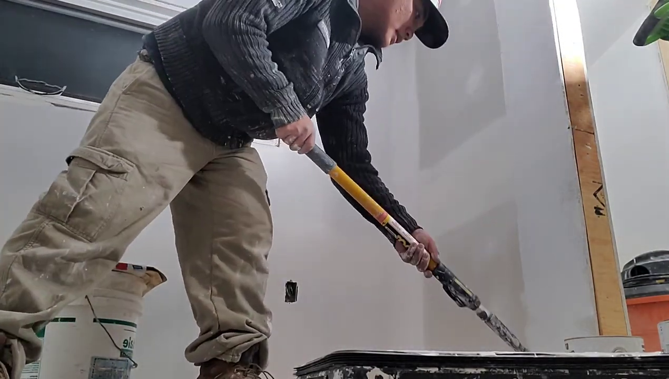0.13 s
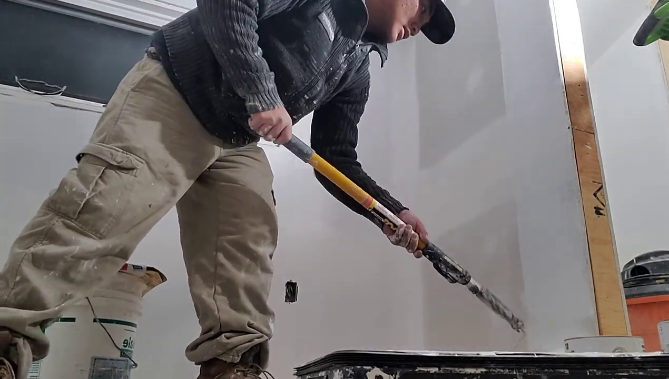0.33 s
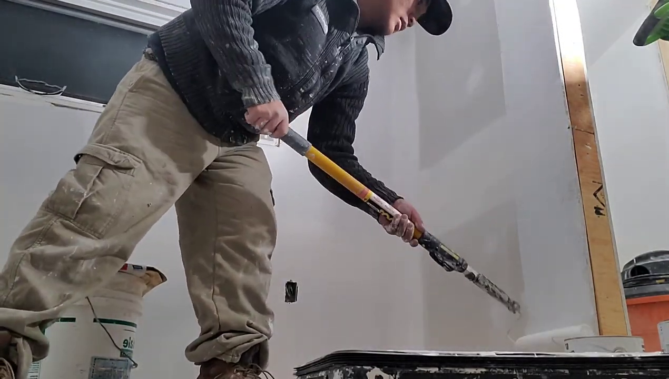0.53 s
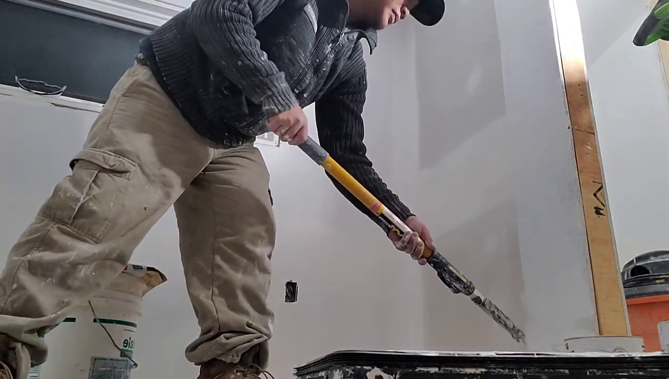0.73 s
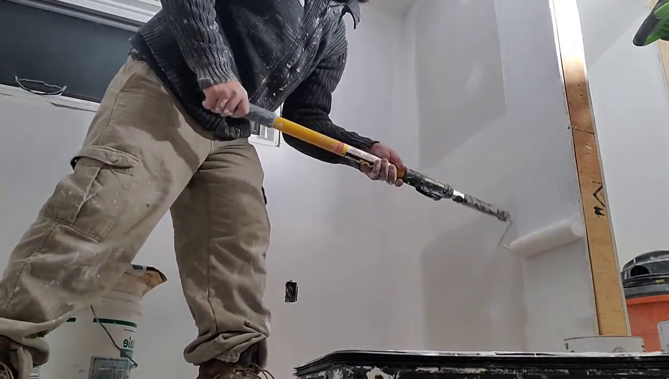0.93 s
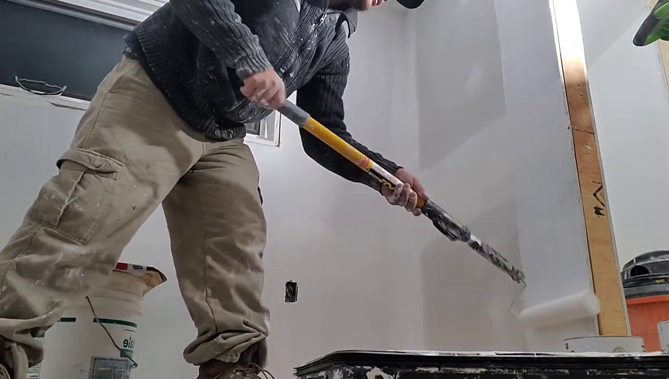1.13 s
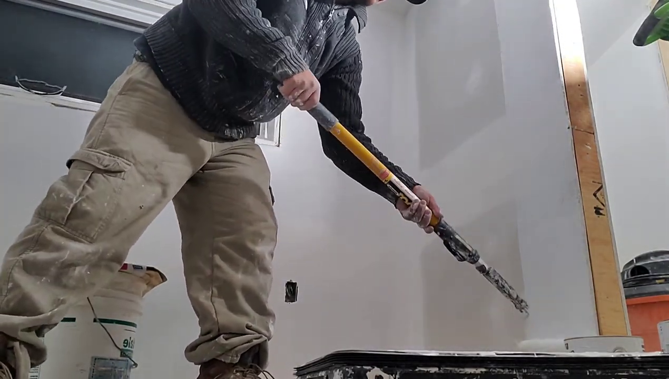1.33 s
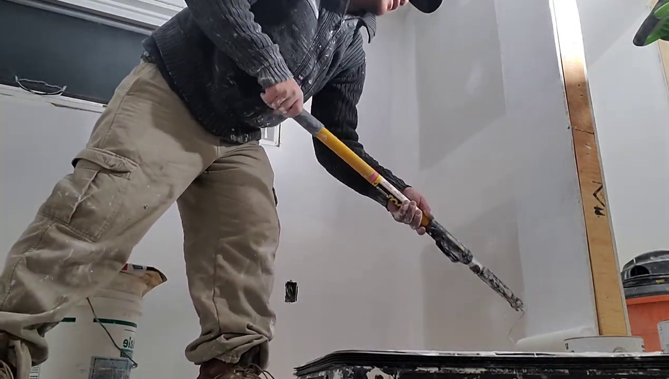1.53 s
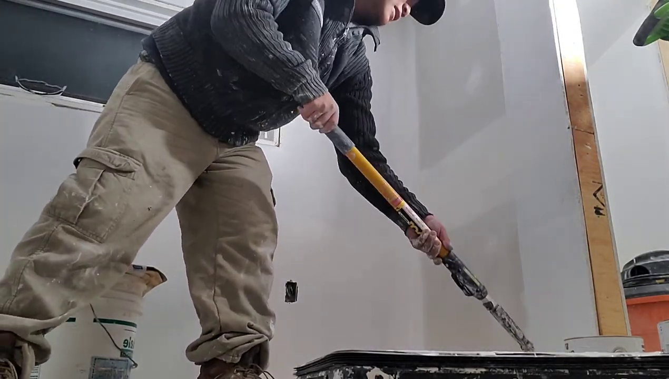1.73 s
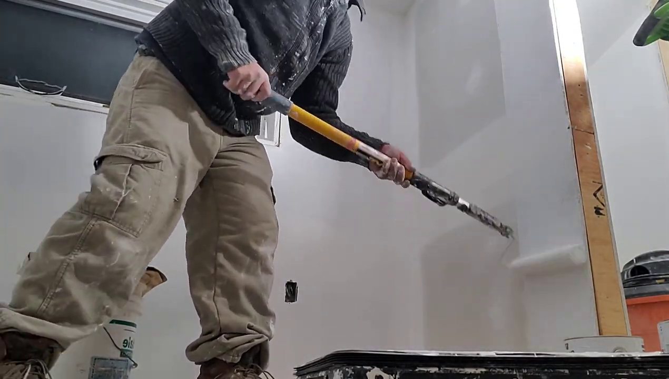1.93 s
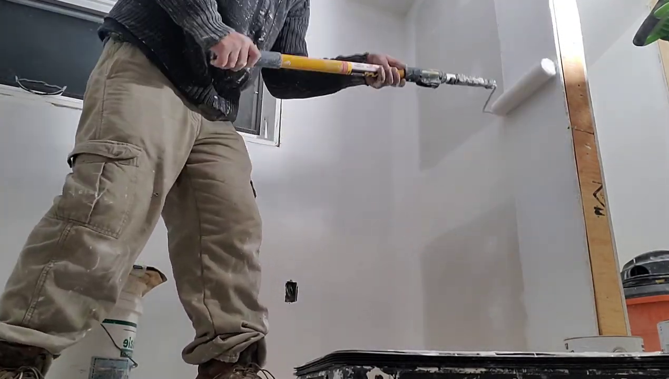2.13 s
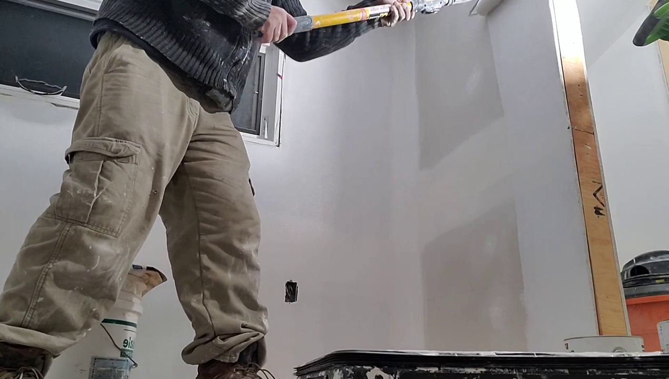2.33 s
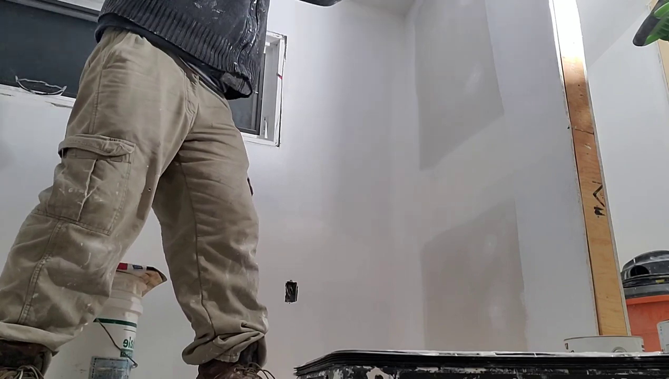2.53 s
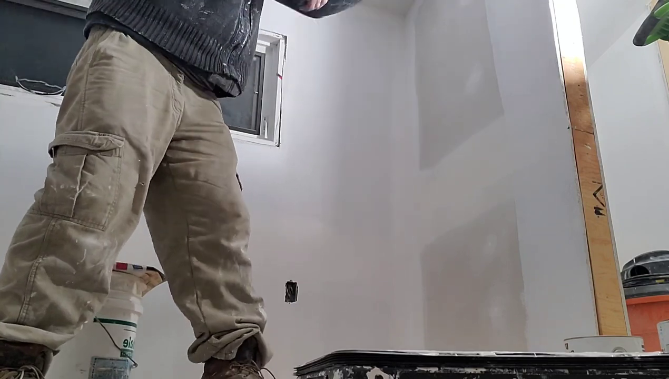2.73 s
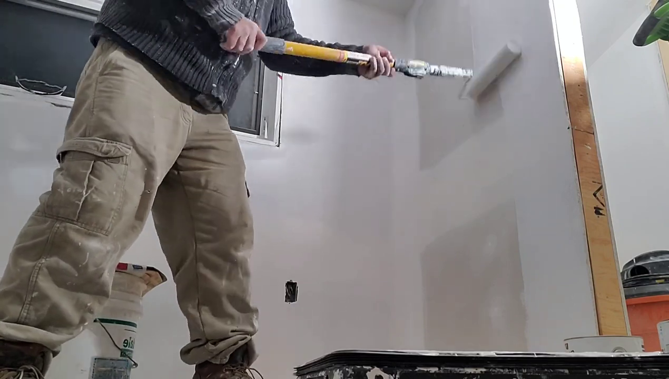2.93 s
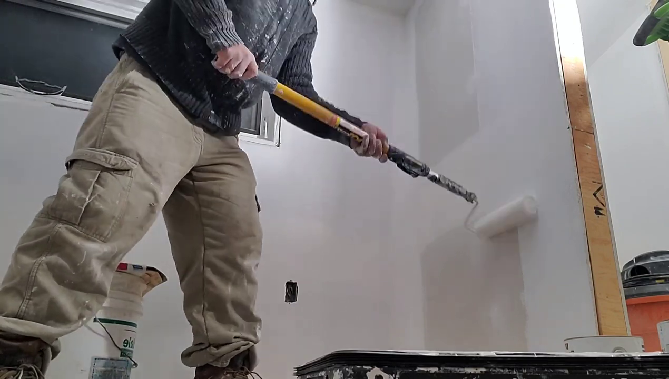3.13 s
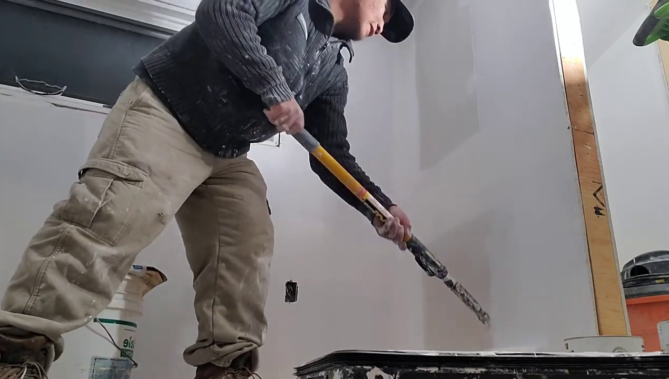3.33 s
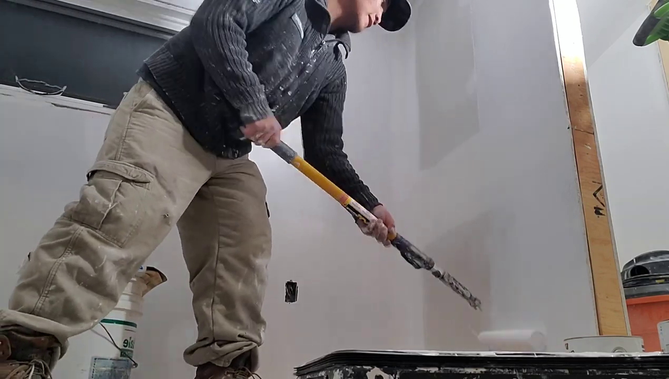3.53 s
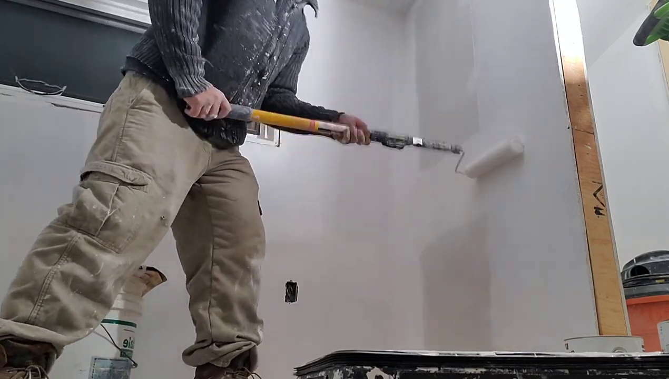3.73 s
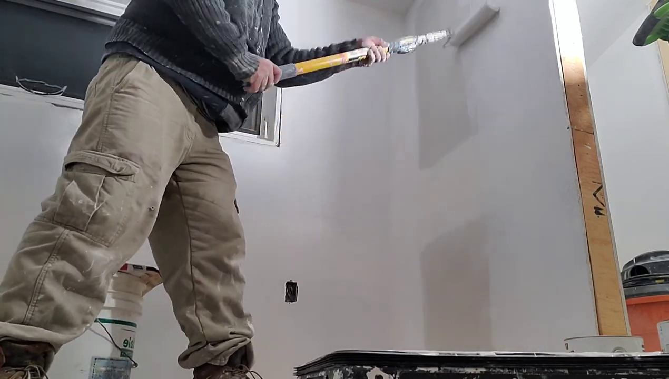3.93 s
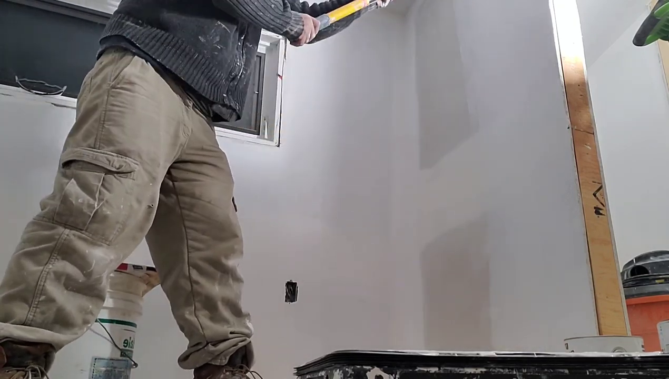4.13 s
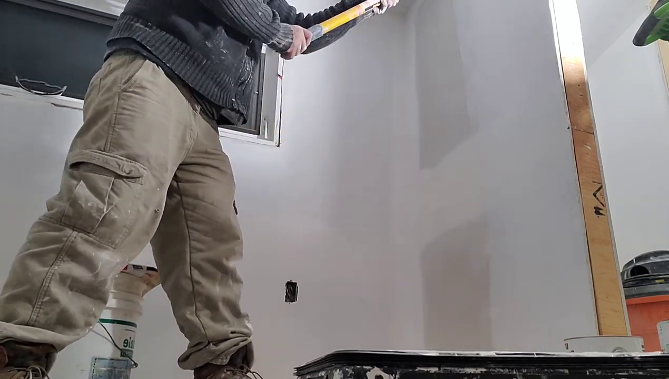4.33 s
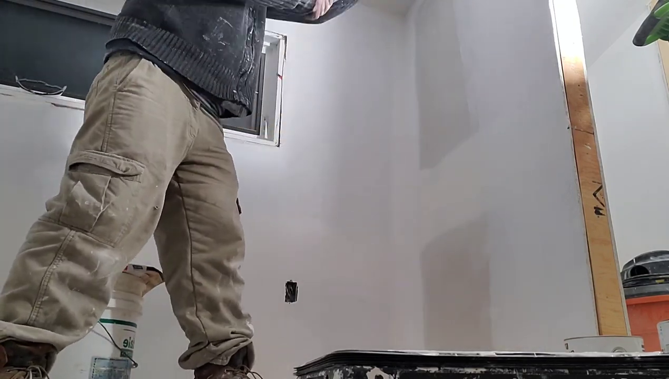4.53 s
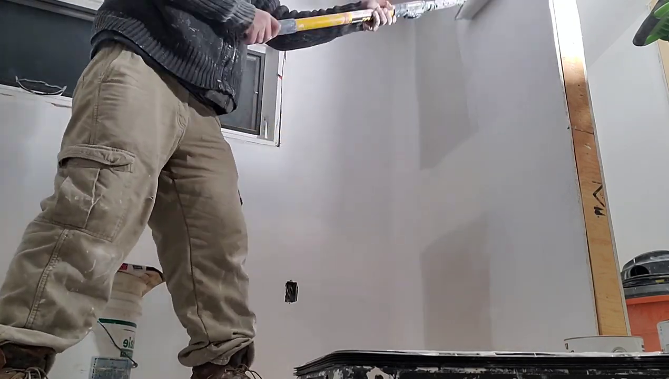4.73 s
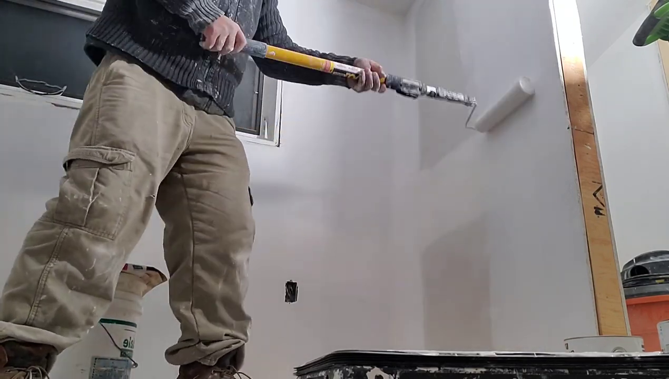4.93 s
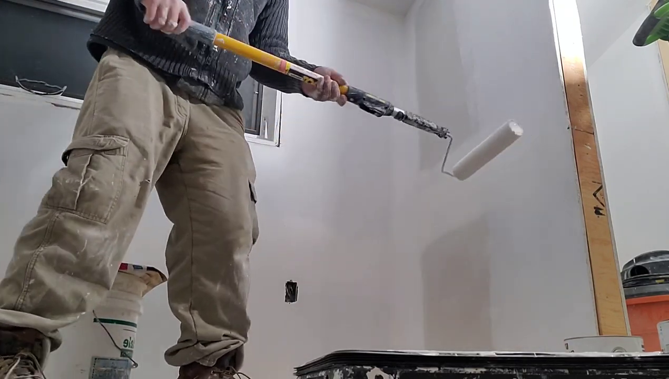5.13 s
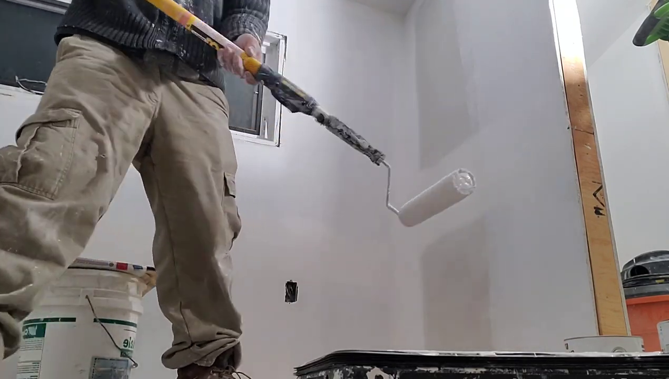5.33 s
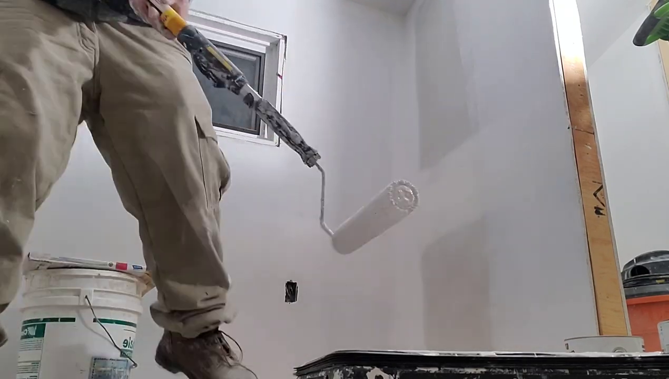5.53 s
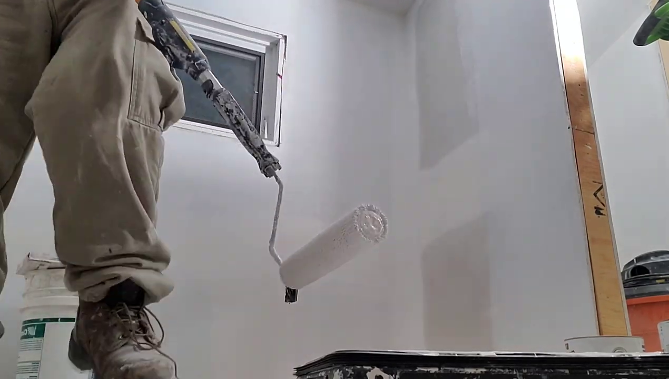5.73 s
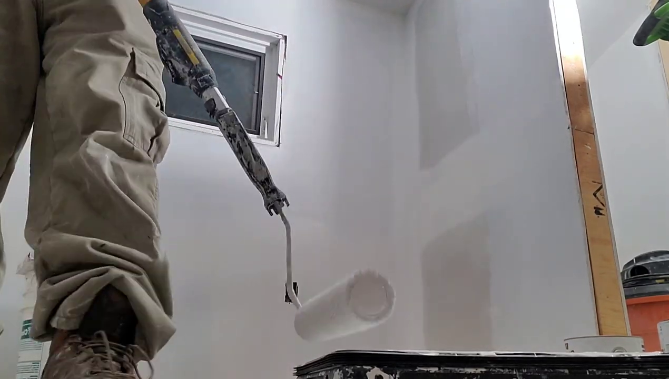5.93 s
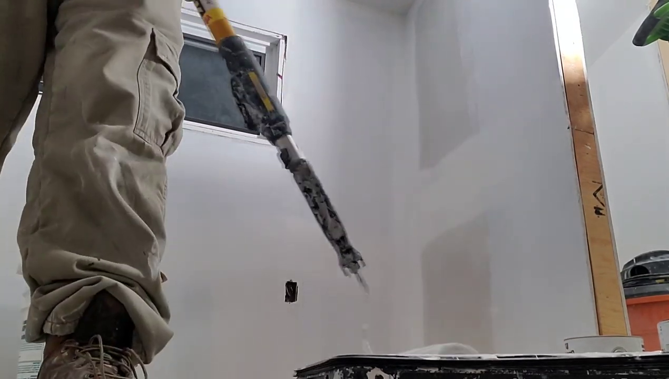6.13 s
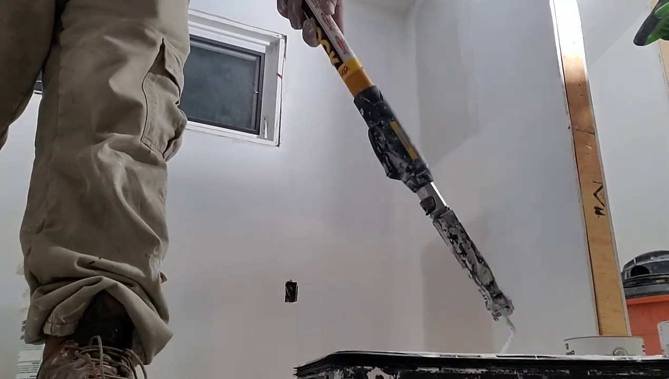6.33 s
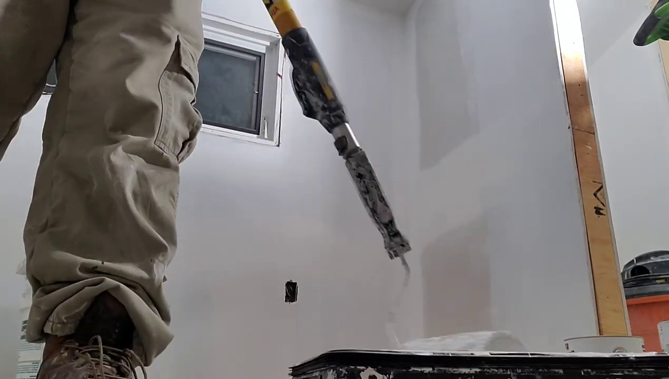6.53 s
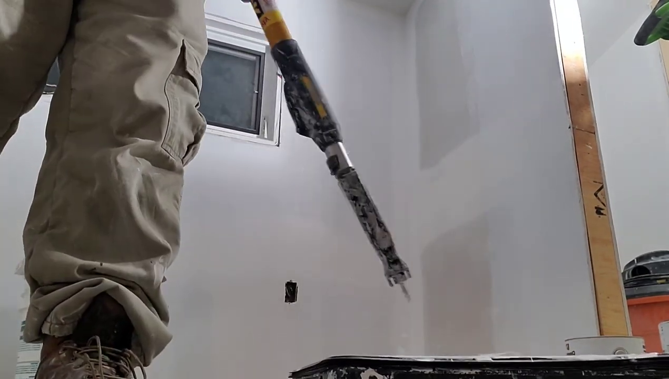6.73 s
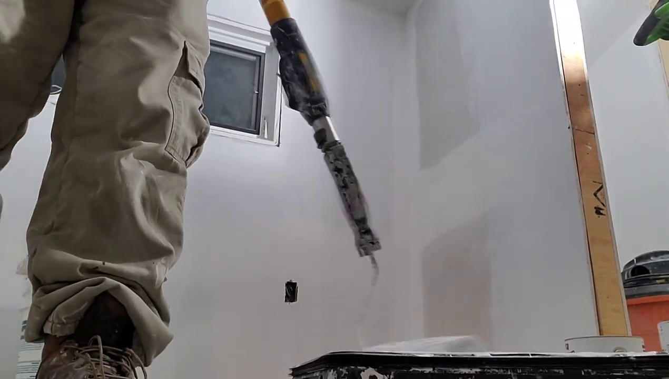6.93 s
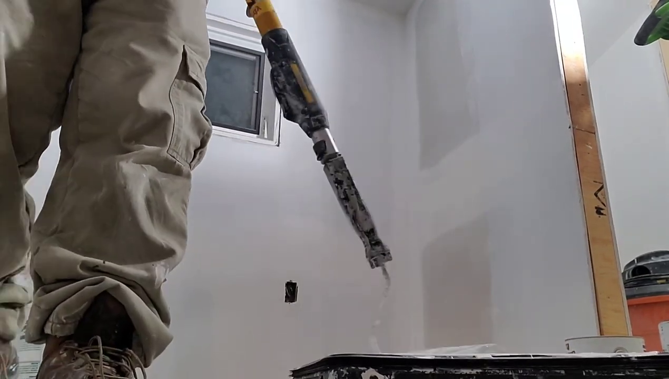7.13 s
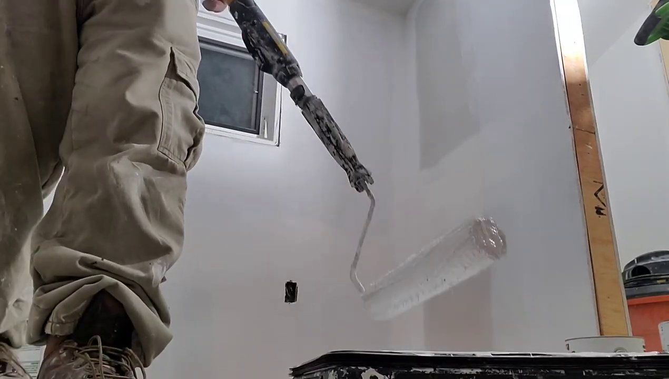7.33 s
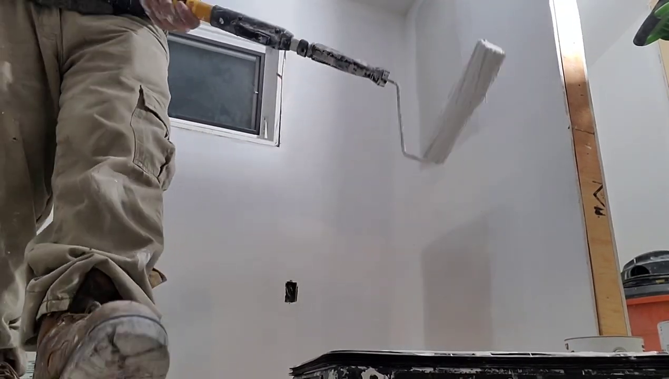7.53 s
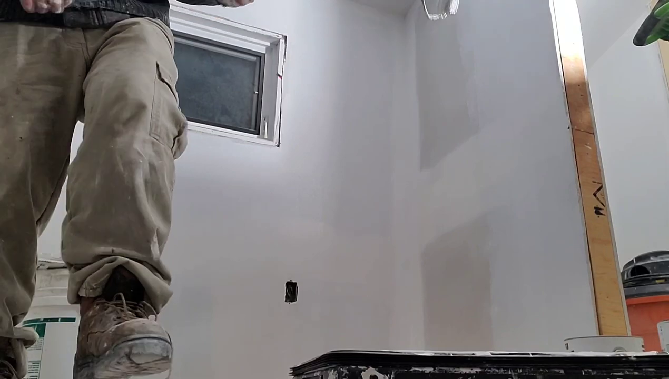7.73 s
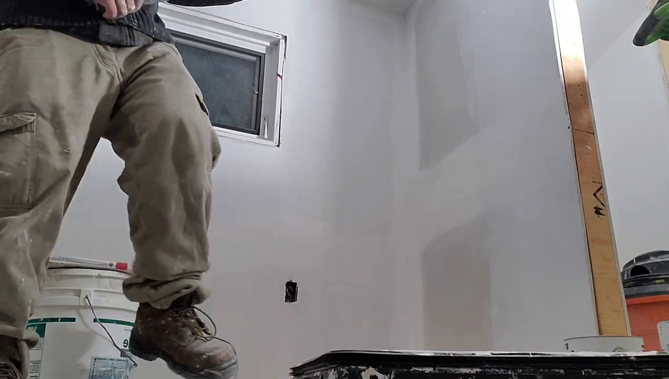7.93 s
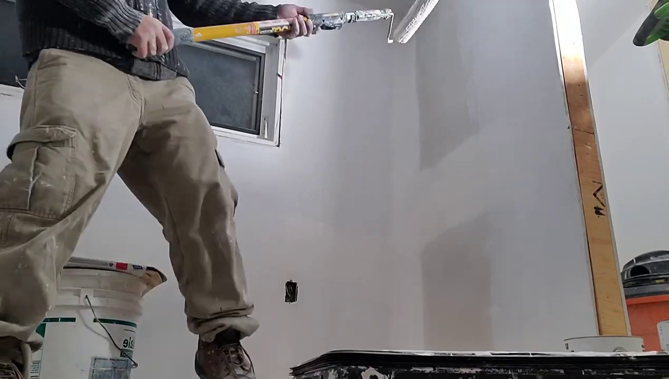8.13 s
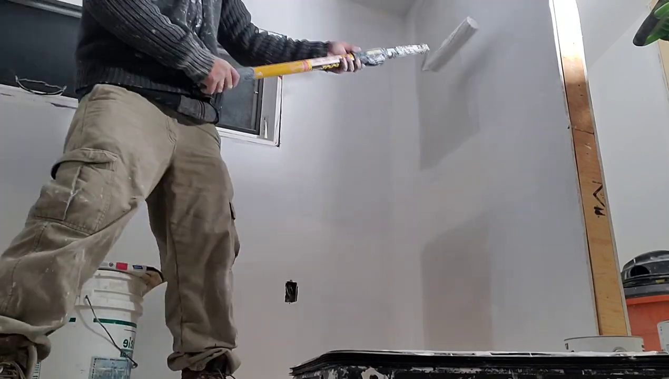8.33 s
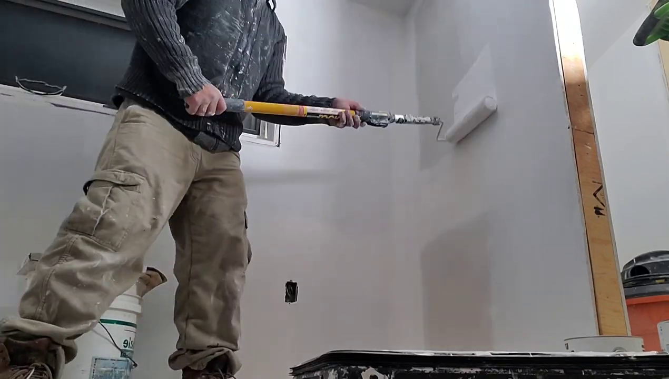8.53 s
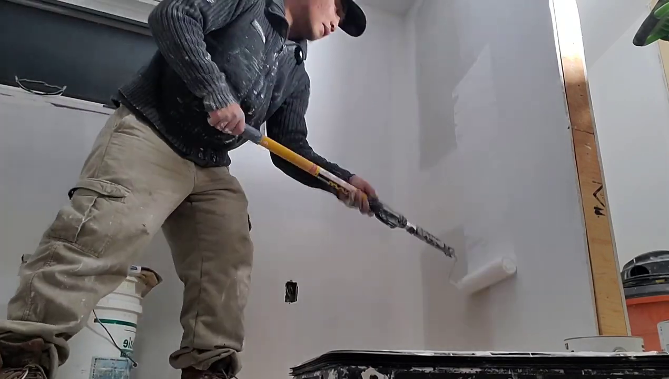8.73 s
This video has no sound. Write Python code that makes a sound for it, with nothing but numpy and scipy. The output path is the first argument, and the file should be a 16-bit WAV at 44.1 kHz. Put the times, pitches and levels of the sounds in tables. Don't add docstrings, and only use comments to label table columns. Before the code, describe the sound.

A wet paint roller hisses and rumbles over hollow drywall in uneven strokes, knocking and rattling, then dips into a plastic tray and returns.

```python
import sys
import numpy as np
from scipy import signal
from scipy.fft import rfft, irfft
from scipy.io import wavfile
from scipy.ndimage import uniform_filter1d

SR = 44100
rng = np.random.default_rng(int(sys.argv[2]) if len(sys.argv) > 2 else 0)


def transcribe(u):
    v = np.clip(np.atleast_2d(u).T, -1, 1)
    q = np.round(v * 32767).astype(np.int16)
    wavfile.write(sys.argv[1], SR, q)


def to_linear_factor(level_db):
    exponent = np.asarray(level_db, float) / 20
    return 10 ** exponent


N = 387198
CONTROL_STEP = 32

# start_s, peak_db, pitch_hz, ring_s, treble_rel_db
SLAPS = [
    (0.376, -16.5, 725, 0.31, -4),
    (0.511, -26.5, 700, 0.024, -3),
    (0.519, -16.5, 796, 0.24, 0),
    (0.813, -21.5, 990, 0.29, -6.5),
    (1.797, -19.5, 770, 0.32, 0),
]


def roller():
    # fastest_s, speed_up_s, slow_down_s, peel_hiss_db, pressure_db
    wall_strokes = [(0.0, .1, 0.26, -49.5, 3), (0.3, 0.086, 0.31, -51, 5.5), (0.55, 0.094, 0.23, -44.5, 9),
                    (0.9, 0.19, 0.22, -46.5, 2.5), (1.17, 0.17, 0.17, -48.5, 2),
                    (1.43, 0.12, 0.089, -56.5, 10), (1.63, 0.19, 0.14, -53.5, 4.5),
                    (1.9, 0.17, 0.48, -46.5, 5.5), (2.3, 0.42, 0.43, -42, 1), (2.919, .22, 0.33, -42, 7),
                    (3.25, 0.2, 0.22, -45.5, 7), (3.451, 0.055, 0.12, -56.5, 18),
                    (3.879, 0.42, 0.39, -38.5, 6), (4.34, 0.087, 0.11, -47, 3),
                    (4.51, 0.11, 0.09, -40.5, -1.5), (4.78, 0.22, 0.35, -38, 3),
                    (8.45, 0.057, 0.27, -47, 16.5), (8.7, 0.15, 0.39, -44, 10)]
    tray_strokes = [
        (6.09, 0.081, 0.097, -53.5, 3),
        (6.24, 0.15, 0.15, -45.5, -1.5),
        (6.62, 0.25, 0.26, -59.5, 14),
        (6.808, 0.14, 0.085, -43.5, -0.5),
        (7.03, 0.081, 0.19, -53, 10.5),
        (7.15, 0.14, 0.12, -49.5, 2),
    ]
    lifts = [(5.2, 0.21, 0.096, -71.5, 29), (5.37, 0.085, 0.25, -65.5, 17.5), (5.62, .15, 0.2, -75.5, 9.5),
             (5.96, 0.095, 0.36, -61.5, 14.5), (6.42, 0.22, 0.13, -64.5, 15), (6.89, .05, 0.068, -57.5, 4),
             (7.42, 0.6, 0.51, -68.5, 17.5), (7.65, 0.17, 0.23, -65, -4), (8.12, 0.99, 0.42, -72.5, 9.5),
             (8.368, 0.068, 0.04, -69, 36.5)]
    # spray_over_peel_db, scrub_over_rumble_db
    surfaces = [
        (1.5, -3.5),
        (-3, 4.5),
        (-7.5, -5),
    ]
    # freq_hz, level_db_per_hz
    peel_spectrum = [(530, -57), (900, -2), (1100, -27), (1190, -32), (1300, -26), (1860, -8.5),
                     (3510, -0.5), (5890, -1), (7040, 0), (8030, -10), (8500, -16), (11000, -14.5),
                     (18700, -120)]
    spray_spectrum = [(4590, -7), (7800, -38), (8090, -2.5), (10200, 5), (13400, 7.5), (15100, 8.5),
                      (15900, 7), (16200, -30.5)]
    scrub_spectrum = [(180, -39), (300, -5), (391, -1.5), (606, -9), (721, -6.5), (963, -20.5), (1400, -22),
                      (1820, -25), (3080, -120)]
    rumble_spectrum = [(13, -40), (30, -8.5), (97, -11.5), (161, 0.5), (215, 7.5), (278, 3.5), (346, -21.5),
                       (400, -17.5), (520, -26), (880, -120)]
    fling_db, fling_db_per_s = -23, 195.5
    speed_law = np.array([[1], [0.99], [1], [1]])

    power = 0
    for rows, (spray_db, scrub_db) in zip((wall_strokes, tray_strokes, lifts), surfaces):
        for *stroke, peel_db, press_db in rows:
            speed = arch(*stroke, 0) ** speed_law
            levels_db = peel_db + np.array([0, spray_db, press_db, press_db + scrub_db])
            power = power + (speed * to_linear_factor(levels_db)[:, None]) ** 2
    for start_s, peak_db, *_ in SLAPS:
        t = np.arange(power.shape[1]) * CONTROL_STEP / SR - start_s
        power[1] += (t > 0) * to_linear_factor(peak_db + fling_db - fling_db_per_s * np.abs(t)) ** 2
    peel, spray, load, nap = map(glide, power)

    tack = to_linear_factor(0.92 * walk(13) + walk(60))
    snaps = 0.5 * unit(grains(2500, 3.25))
    hiss = spread(tack, snaps, peel_spectrum) * peel * to_linear_factor(-0.5)
    hiss += spread(tack, snaps, spray_spectrum) * spray * to_linear_factor(0.2 * walk(1.1))

    rumbles = []
    for _ in range(2):
        lumps = rng.standard_normal(N) * to_linear_factor(1.8 * walk(25)) + 0.47 * unit(grains(90, 1.6))
        rumbles.append(unit(colour(lumps + 1.5 * wall(lumps), rumble_spectrum)))
    rumble = ports(*rumbles) * load
    scrub = spread(to_linear_factor(2.5 * walk(30)), 0.33 * unit(grains(120, 2)), scrub_spectrum) * nap
    return lean(hiss, -1) + rumble + scrub


def tray():
    # hardest_s, build_up_s, let_go_s, level_db
    squeezes = [(3.455, 0.051, 0.083, -42), (6.1, 0.12, 0.31, -43), (6.3, 0.12, 0.15, -47.5),
                (6.67, 0.05, 0.024, -42), (6.815, 0.17, 0.036, -36), (7.04, 0.09, 0.25, -41),
                (7.45, 0.82, 0.38, -64), (8.31, 0.14, 0.094, -59), (5.08, 0.13, 0.081, -53),
                (8.472, 0.034, 0.082, -28), (8.525, 0.049, 0.048, -32.5), (8.65, 0.38, 0.45, -42)]
    body = [(500, -11.5), (850, -3.5), (1250, -7.0), (1800, -7.0),
            (2600, -2.0), (3500, -5.5), (4800, -7.0), (8000, -22.5)]
    chatter = spread(to_linear_factor(3.4 * walk(28)), 0.76 * unit(grains(400, 2.3)), body)
    return chatter * arches(squeezes) * to_linear_factor(-1.5)


def thuds():
    # start_s, peak_db, pitch_hz, ring_s, crack_rel_db
    knocks = [(0.374, -27, 192, 0.17, 8), (0.507, -27, 162, 0.084, -9), (0.519, -17, 167.3, 0.23, -6),
              (0.921, -22.5, 211, 0.078, -41), (1.231, -9, 189, 0.066, -14),
              (1.247, -10, 165, 0.035, -11.5), (1.277, -18, 154, 0.043, -5), (1.318, -19, 179, 0.07, -13.5),
              (1.616, -35, 143, 0.079, -36.5), (1.79, -24, 170, 0.1, 1.5), (1.919, -15.5, 179, 0.029, -30),
              (2.429, -34, 139, 0.16, -4), (2.971, -21.5, 159, 0.061, -4.5), (2.991, -18, 154, 0.079, -13),
              (3.461, -19, 162, 0.11, -16), (3.727, -26, 141, 0.017, -25.5), (4.002, -25.5, 172, 0.17, -22),
              (4.08, -32, 134, 0.15, -19), (4.88, -15, 155.3, 0.047, -8), (5.137, -11, 147, 0.044, -13),
              (7.451, -28.5, 166, 0.049, -38), (8.179, -19.5, 159, 0.11, -50), (8.266, -28, 154, 0.14, -32),
              (8.463, -10, 142, 0.063, -6.5), (8.5, -13.5, 172.5, 0.12, -9)]
    # start_s, peak_db, pitch_hz, ring_s, crack_rel_db
    raps = [(0.813, -34, 408, 0.25, 4), (1.286, -23, 281, 0.14, 2), (5.107, -20, 287, 0.03, -18.5),
            (5.112, -6.5, 254, 0.045, -17.5), (5.921, -26, 224, 0.057, -19.5), (6.481, -19, 234, 0.061, -4),
            (6.495, -15.5, 240.5, 0.11, -8), (6.529, -16, 231, 0.038, -6), (6.513, -13, 250.4, 0.13, -12.5),
            (6.992, -21, 244, 0.047, -6.5), (7.122, -25.5, 417, 0.09, -28.5),
            (8.331, -30.5, 250, 0.077, -1.5)]
    # start_s, peak_db, pitch_hz, crack_rel_db
    thumps = [(1.233, -20, 100, -36), (5.111, -13.5, 116.5, -35), (1.548, -35.5, 120, -18),
              (5.308, -23, 98, -18), (5.329, -24, 82.5, -17), (5.379, -25, 92, -15), (5.915, -26, 88, -38),
              (5.963, -20, 82, -14.5), (6.035, -37, 78, 4), (6.149, -35.5, 80, -6), (6.246, -43, 74.5, 4),
              (6.379, -39, 81, -10), (6.657, -26.5, 74, -32), (6.76, -40.5, 82.5, 8), (6.841, -42.5, 83, 4),
              (7.207, -36, 86, -10), (7.291, -19.5, 105, -17), (7.592, -28, 88, -6.5),
              (8.389, -31, 61.4, -15), (8.451, -8.5, 128, -22), (7.334, -31, 86, -30),
              (7.475, -37, 87, -33)]
    board_ring_s, build_cycles, lag_s = 0.039, 0.86, 0.00323
    rattle_spectrum = [(150, -29.0), (350, 9.5), (550, 13.5), (900, 0.0),
                       (1300, -23.0), (3000, -21.5), (8000, -39.5)]
    pad_spectrum = [(30, -23.5), (65, 3.5), (100, 5.5), (140, 2.5),
                    (800, -5.0), (1400, -15.0), (3000, -45.5)]

    blow, crack = np.zeros(N + SR), np.zeros(N + SR)
    t = np.arange(SR // 3) / SR
    rattle = unit(colour(rng.standard_normal(N + SR), rattle_spectrum))
    boards = [(s, db, hz, board_ring_s, crack_db) for s, db, hz, crack_db in thumps]
    for start_s, peak_db, hz, ring_s, crack_db in knocks + raps + boards:
        i = int((start_s + lag_s) * SR)
        build_s = build_cycles / max(hz, 175)
        fade = to_linear_factor(peak_db - 3.0) * swell_decay(t, build_s, np.clip(ring_s, 0.02, 0.3))
        sagging_hz = hz * (1 + 0.25 * np.exp(-t / 0.0062))
        swing = -np.sin(2 * np.pi * np.cumsum(sagging_hz) / SR)
        noise = ring(rng.standard_normal(len(t)), 1.4 * hz, 1.5 * hz)
        shudder = unit(ring(noise, 0.89 * hz, 1.5 * hz))
        blow[i:i + len(t)] += fade * (swing + 0.44 * shudder)
        crack[i:i + len(t)] += fade * to_linear_factor(crack_db + 2.0) * rattle[i:i + len(t)]
    blow = colour(blow, pad_spectrum)
    hits = 1.76 * blow + 0.41 * wall(blow) + crack + rings()
    return room(hits[:N], wet_db=-5)


def rings():
    # start_s, peak_db, pitch_hz, swell_s, ring_s
    clean_rings = [(0.552, -9, 378, .013, 0.061), (0.582, -16, 368, 0.01, 0.069),
                   (.598, -24, 335, 0.0067, .04), (.615, -16, 365, 0.011, 0.046),
                   (0.639, -37, 343, 0.0053, .05), (0.655, -35, 360, 0.012, .05),
                   (.678, -34, 350, 0.0091, 0.092), (.694, -44, 387, 0.0066, .07),
                   (.722, -47, 356, 0.0075, .06), (1.290, -21.5, 663, 0.0055, 0.078),
                   (1.284, -31.5, 885, 0.005, 0.073), (1.305, -34, 1080, .006, 0.066),
                   (1.278, -14, 155, 0.0082, 0.035), (1.312, -28, 298, 0.0045, 0.073),
                   (1.352, -22, 283, .006, 0.08), (1.398, -31.5, 346, 0.0052, 0.09),
                   (3.481, -20, 170, 0.0083, 0.058), (3.514, -29, 156, 0.013, 0.073),
                   (5.121, -7.5, 472, 0.0059, 0.01), (5.150, -12.5, 282, .005, 0.077),
                   (5.165, -12, 316, 0.0043, 0.04), (5.185, -29, 253, .005, 0.073),
                   (5.223, -33, 282, .006, .15), (5.256, -36, 303, 0.0043, 0.12),
                   (6.499, -36, 2550, 0.0044, 0.027), (1.258, -15, 185.5, .007, 0.07),
                   (6.588, -17.5, 823, 0.0025, 0.037), (6.618, -25, 787, 0.0052, 0.042),
                   (7.298, -19, 302, 0.0028, 0.014), (8.462, -12.5, 790, 0.004, 0.024),
                   (8.545, -17, 130, 0.0056, .12), (8.587, -15, 146, 0.0073, 0.032),
                   (8.632, -23, 128, 0.0073, 0.083), (8.672, -37, 150, 0.0089, 0.068),
                   (0.80, -36, 71, 0.015, 0.25), (3.6, -40, 45, 0.057, 0.32),
                   (4.52, -30, 174, 0.0099, 0.17), (8.19, -33, 66, .015, 0.35), (8.39, -27, 45, .03, .3),
                   (8.737, -24, 112, .012, 0.13)]
    out, t = np.zeros(N + SR), np.arange(SR // 5) / SR
    for start_s, peak_db, hz, swell_s, ring_s in clean_rings:
        i = int(start_s * SR)
        fade = to_linear_factor(peak_db) * swell_decay(t, swell_s, ring_s)
        out[i:i + len(t)] += fade * np.sin(2 * np.pi * hz * t)
    return out


def clicks():
    # start_s, peak_db, ring_s, treble_rel_db
    frame_clicks = [(2.427, -21.5, 0.033, -36), (2.432, -19.5, 0.032, -29), (4.002, -13, 0.05, -15.5),
                    (4.886, -30.5, 0.067, -12.5), (5.112, -30, 0.043, -33.5), (5.118, -25, 0.23, -45),
                    (5.324, -40.5, 0.1, -11), (6.015, -25, 0.069, -34), (6.248, -29, 0.053, -23),
                    (6.256, -28, 0.06, -20), (6.485, -25, 0.11, -47.5), (6.503, -26.5, 0.15, -23),
                    (6.535, -21.5, 0.024, -39), (6.622, -50, 0.053, -30), (6.657, -26, 0.031, -17),
                    (6.699, -37, .04, -16), (6.793, -33, 0.033, -3), (6.817, -24.5, 0.05, -6.5),
                    (6.974, -24, 0.065, -28), (7.006, -21.5, 0.034, -24.5), (7.71, -43, 0.093, -26)]
    # start_s, peak_db, pitch_hz, ring_s, treble_rel_db
    splashes = [
        (5.36, -39.5, 2560, 0.13, -7),
        (5.921, -37, 735, 0.21, -8.5),
        (6.162, -35, 2460, 0.068, -25),
        (6.203, -37.5, 2490, 0.23, 8.5),
        (8.379, -36.5, 1080, 0.53, -2.5),
    ]
    ticks = [
        (0.195, -41, 1820, 0.034, -8),
        (1.240, -32.5, 754, 0.089, -13),
        (5.688, -48, 973, 0.06, -15.5),
        (5.857, -40, 2820, 0.14, -14),
        (7.599, -32, 710, 0.077, -3),
        (7.9, -43, 930, 0.09, -3),
        (8.051, -54, 3310, 0.13, 4.5),
    ]
    ribs = [
        (6.272, -29, 940, .05, -40.5),
        (6.305, -17, 1510, 0.025, -56),
        (6.336, -30, 950, 0.088, -44),
        (6.588, -12.5, 1670, 0.013, -36),
        (5.921, -40, 5600, 0.069, -9),
        (6.022, -38, 2700, .04, -18),
    ]
    # freq_hz, gain_db
    phone_colour = [(1000, 7.5), (4500, 13), (6600, 4), (7500, -5.5), (8100, -16.5), (11000, -0.5),
                    (15500, 14.5)]
    frame_hz = 760
    near_wet_db = -2

    frame = [(s, db, frame_hz, ring_s, treble_db) for s, db, ring_s, treble_db in frame_clicks]
    # rows, top octave over treble (dB), near the phone
    kinds = ((SLAPS, 14.5, 0), (splashes, 8.5, 0), (ticks, -34.5, 0), (frame + ribs, 8.5, 1))
    out, t = np.zeros((2, N + SR)), np.arange(SR // 6) / SR
    noise = rng.standard_normal(N + SR)
    for rows, top_over_db, near in kinds:
        for start_s, peak_db, hz, ring_s, treble_db in rows:
            i = int(start_s * SR)
            top_db = treble_db + top_over_db
            decay = to_linear_factor(-60 * t / np.clip(ring_s, 0.005, 0.4)) + 0.61 * np.exp(-t / 0.0013)
            burst = noise[i:i + len(t)] * decay
            slope = [(300, -15.5), (700, 0.5), (2000, -4.0), (3600, 0.26 * treble_db - 3.0),
                     (5500, treble_db), (7500, treble_db + 14.5), (9000, top_db), (16000, top_db - 21.5)]
            hit = colour(burst, slope, size=256)
            hit += 1.55 * ring(burst, hz, 0.11 * hz)
            hit += 0.54 * ring(burst, 0.64 * hz, 0.49 * hz)
            out[near, i:i + len(t)] += to_linear_factor(peak_db - 9.5) * hit
    far, close = (colour(v[:N], phone_colour) for v in out)
    dry_close = (1 - to_linear_factor(near_wet_db)) * ports(close, np.roll(close, 8))
    return lean(room(far + to_linear_factor(near_wet_db) * close, wet_db=-4) + dry_close, 0.5)


def booms():
    # loudest_s, peak_db, pitch_hz, ring_s
    deep_swings = [(0.831, -37, 92, .1), (0.934, -28, 95, .1), (1.245, -20, 99, .07), (1.285, -19, 94, .07),
                   (2.105, -35, 192, .05), (2.981, -31, 101, .06), (3.007, -27, 106, 0.093),
                   (3.197, -34, 305, 0.035), (3.477, -22, 150, 0.11), (3.676, -27, 167, .04),
                   (3.691, -23.5, 322, 0.065), (3.713, -23, 88, 0.055), (3.737, -24, 95, 0.067),
                   (3.738, -14, 140, 0.021), (1.284, -9, 165, 0.044), (4.889, -8, 153, 0.059),
                   (5.319, -23, 129, .04), (5.339, -24, 86.3, 0.17), (8.277, -25, 152, .03),
                   (8.41, -35, 80, .05), (.575, -21.5, 371.7, 0.28), (6.55, -27, 50.6, 0.25),
                   (8.47, -23, 99, 0.088), (3.936, -33, 340, .05), (3.980, -30, 200, .06),
                   (4.699, -28, 179, 0.1), (4.745, -30, 185, .04), (4.868, -19.5, 217, 0.024),
                   (4.889, -16.5, 98, 0.097), (4.955, -24, 170, 0.077), (5.121, -7, 171, 0.052),
                   (5.123, -21, 102, .06), (5.186, -24, 101, .07), (5.934, -25, 82, 0.11),
                   (5.957, -20, 183, 0.035), (5.976, -26, 297, 0.064), (6.264, -35, 80, 0.32),
                   (6.678, -32, 84.4, 0.14), (6.808, -32, 89, .1), (7.351, -36, 85, 0.078),
                   (7.489, -31, 87, 0.13), (7.623, -32, 82, 0.15), (8.234, -41, 89, 0.065),
                   (8.256, -27, 181, .06), (8.274, -32, 94, .07), (8.350, -34, 92, .1),
                   (8.524, -16, 174, .04), (8.533, -16, 95, 0.13), (8.576, -18, 91, 0.06),
                   (8.638, -31, 95, .06)]
    out, t = np.zeros(N + SR), np.arange(SR // 4) / SR
    for loudest_s, peak_db, hz, ring_s in deep_swings:
        swell_s = 0.81 / hz
        i = int((loudest_s - swell_s) * SR)
        fade = to_linear_factor(peak_db) * swell_decay(t, swell_s, ring_s)
        out[i:i + len(t)] += fade * np.sin(2 * np.pi * hz * t)
    out = colour(out[:N], [(25, -12.5), (70, 0)])
    return ports(out, np.roll(out, 8))


def cloth():
    # fastest_s, speed_up_s, slow_down_s, level_db
    brushes = [
        (5.58, 0.06, .12, -67),
        (7.64, 0.11, 0.25, -56.5),
    ]
    airy = [(9000, -25.0), (12000, -8.0), (13800, 0.0), (15500, -7.5)]
    return spread(to_linear_factor(1.9 * walk(30)), np.zeros(N), airy) * arches(brushes)


def hush():
    # freq_hz, level_db_per_hz
    hush_spectrum = [(18, -54.5), (30, -31.5), (145, -18), (198, 0.5), (258, -8.5), (883, -22),
                     (1530, -28.5), (7500, -41.5), (8200, -46), (15800, -33.5)]
    return spread(to_linear_factor(0.92 * walk(8.8)), np.zeros(N), hush_spectrum) * to_linear_factor(-64)


def wall(x):
    # freq_hz, width_hz, gain_db
    wall_modes = [(74.4, 35, 16), (117, 19, -14.5), (159, 9.2, -11.5), (281, 29, 4), (368, 21.5, 3.5),
                  (470, 28, -5), (640, 47, -21)]
    return sum(to_linear_factor(db) * ring(x, hz, width_hz) for hz, width_hz, db in wall_modes)


def room(x, wet_db):
    # freq_hz, t60_s
    decay_times = [(60, 0.27), (250, 0.27), (1000, 0.39), (4000, 0.25), (12000, 0.11)]
    # freq_hz, gain_db
    tail_colour = [(90, -7.5), (200, -5.5), (400, -2), (800, -0.5)]
    t = np.arange(SR // 2) / SR
    out = []
    for lag in (0, 10):
        hz, frame_s, z = signal.stft(rng.standard_normal(len(t)), SR, nperseg=512)
        decay = to_linear_factor(-60 * frame_s / read(decay_times, hz)[:, None])
        tail = signal.istft(z * decay, SR)[1][:len(t)] * np.minimum(t / 0.00072, 1)
        response = to_linear_factor(wet_db) * colour(unit(tail), tail_colour) / np.sqrt(len(t))
        response[lag] += 1
        response /= np.sqrt(np.sum(response ** 2))
        out.append(signal.oaconvolve(x, response)[:N])
    return ports(*out)


def ports(mid, side):
    # freq_hz, side_minus_mid_db
    side_width = [(30, -16), (70, -19), (110, -21), (200, -20.5), (380, -11.5), (700, -3.5), (1290, 2),
                  (2400, -0.5), (4400, -0.5), (8100, -0.5)]
    side = colour(side, side_width)
    return np.array([mid + side, mid - side])


def lean(pair, db):
    return pair * to_linear_factor(np.array([[db], [-db]]) / 2)


def spread(swell, ticks, table):
    smear = np.exp(-np.arange(400) / 60.)
    pair = []
    for _ in range(2):
        dense = swell * rng.standard_normal(N)
        echo = unit(smear * rng.standard_normal(400)) / 20
        dense = dense + signal.oaconvolve(ticks, echo)[:N]
        pair.append(unit(colour(dense, table)))
    return ports(*pair)


def arch(peak_s, rise_s, fall_s, db):
    turn_db, turn_shape = 30, 3.66
    t = np.arange(0, N + CONTROL_STEP, CONTROL_STEP) / SR - peak_s
    gone = np.where(t < 0, -t / rise_s, t / fall_s)
    return to_linear_factor(db - turn_db * np.minimum(gone, 4) ** turn_shape)


def arches(rows):
    return glide(sum(arch(*row) ** 2 for row in rows))


def glide(power):
    return np.interp(np.arange(N), np.arange(len(power)) * CONTROL_STEP, np.sqrt(power))


def swell_decay(t, swell_s, ring_s):
    swell = np.sin(np.minimum(t / swell_s, 1) * np.pi / 2) ** 2
    return swell * to_linear_factor(-60 * np.maximum(t - swell_s, 0) / ring_s)


def walk(rate_hz):
    hold = int(SR / rate_hz)
    steps = np.repeat(rng.standard_normal(N // hold + 1), hold)
    return unit(uniform_filter1d(uniform_filter1d(steps, hold), hold)[:N])


def grains(rate_hz, spread_db):
    hits = rng.random(N) < rate_hz / SR
    size = to_linear_factor(spread_db * np.minimum(rng.exponential(size=N), 4.5))
    return hits * rng.standard_normal(N) * size


def ring(x, hz, width_hz):
    return signal.lfilter(*signal.iirpeak(hz, hz / width_hz, fs=SR), x)


def colour(x, table, size=4096):
    curve_db = read(table, np.arange(size // 2 + 1) * SR / size)
    cepstrum = irfft(curve_db * np.log(10) / 20)
    cepstrum[1:size // 2] *= 2
    cepstrum[size // 2 + 1:] = 0
    return signal.oaconvolve(x, irfft(np.exp(rfft(cepstrum))))[:len(x)]


def read(table, hz):
    table_hz, value = np.transpose(table)
    return np.interp(np.log(np.maximum(hz, 1)), np.log(table_hz), value)


def unit(x):
    return x / np.sqrt(np.mean(x ** 2))


def scene():
    return roller() + tray() + thuds() + clicks() + cloth() + hush() + booms()


def top_cut(x):
    return signal.sosfilt(signal.butter(12, 16075, fs=SR, output="sos"), x)


def record(dry):
    # freq_hz, left_minus_right_db
    port_lean = [(60, -1.3), (130, -0.1), (300, -2), (500, -4.5), (1300, -5), (2400, -3.5), (4400, -3),
                 (6800, -11), (8600, -1.5), (11000, 0), (13000, -3.5), (15700, -7.5)]
    ears = []
    for channel, sign in zip(np.tanh(0.59 * dry) / 0.6, (1, -1)):
        tilt = [(hz, sign * db / 2) for hz, db in port_lean]
        ears.append(colour(channel, [(8.6, 7)] + tilt + [(15950, -5), (16080, -69.5)]))
    return top_cut(np.array(ears))


dry = scene()
out = record(dry)
transcribe(out)
```